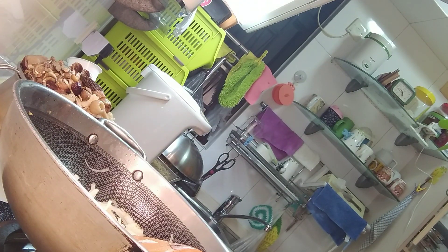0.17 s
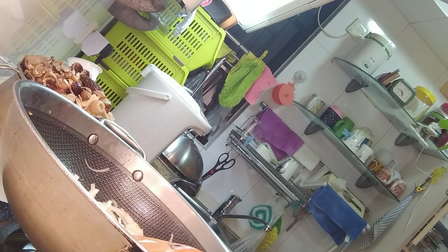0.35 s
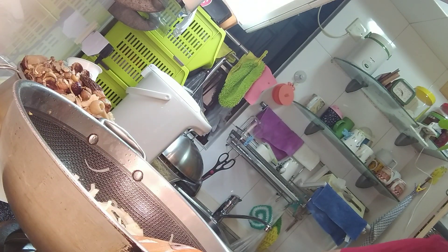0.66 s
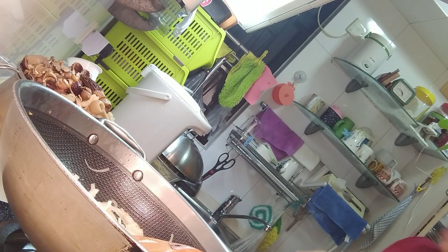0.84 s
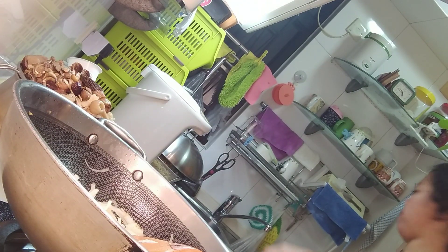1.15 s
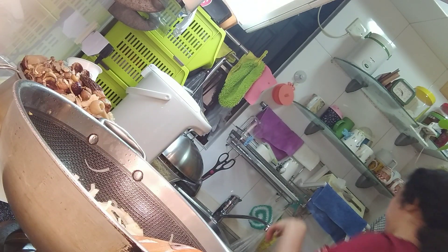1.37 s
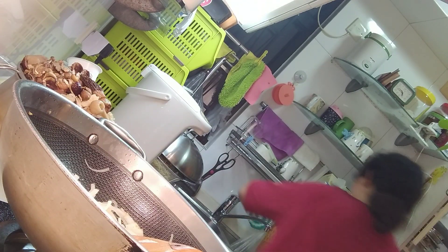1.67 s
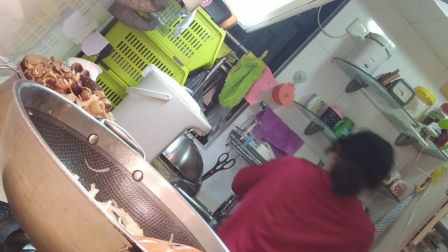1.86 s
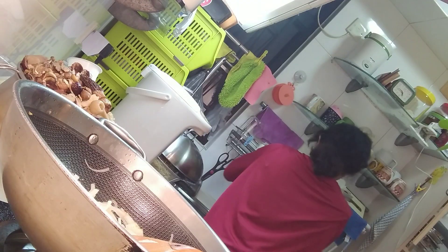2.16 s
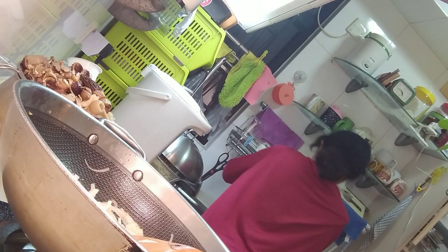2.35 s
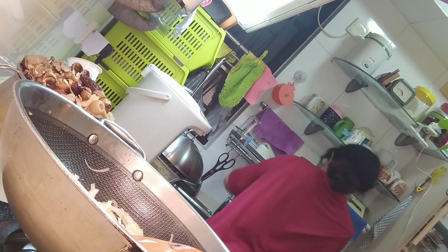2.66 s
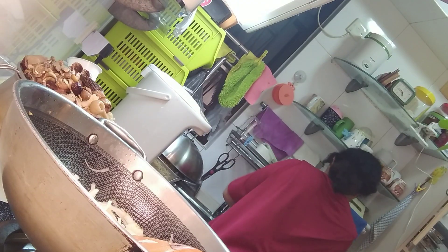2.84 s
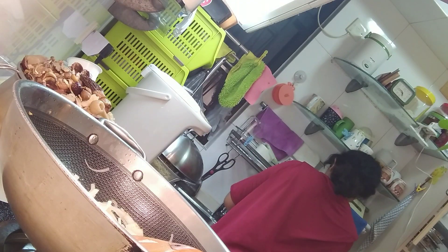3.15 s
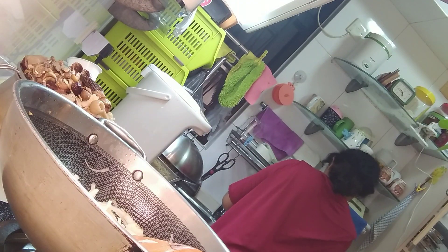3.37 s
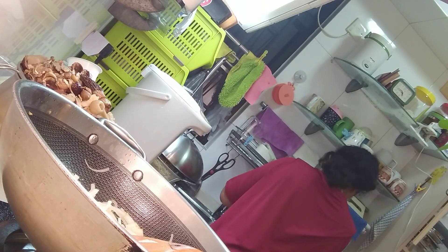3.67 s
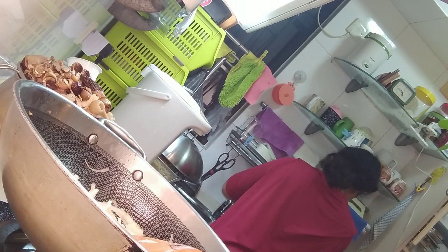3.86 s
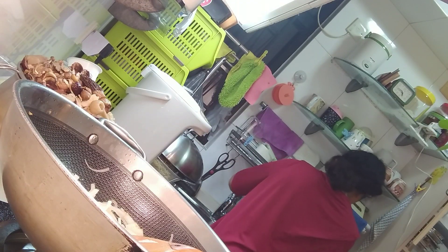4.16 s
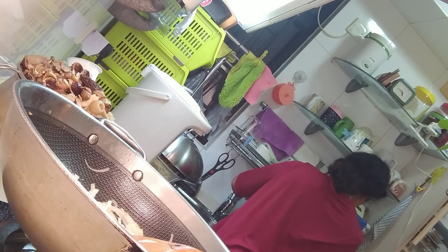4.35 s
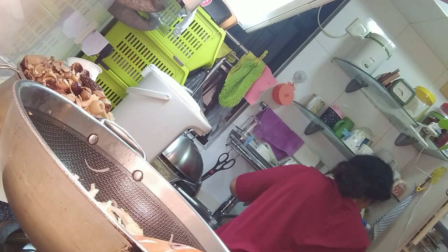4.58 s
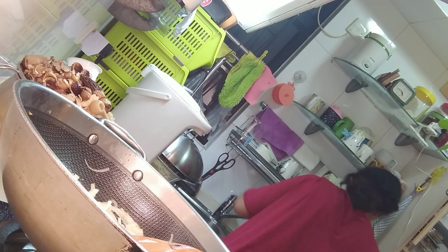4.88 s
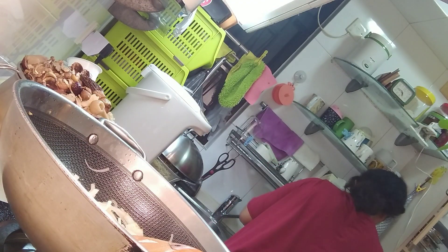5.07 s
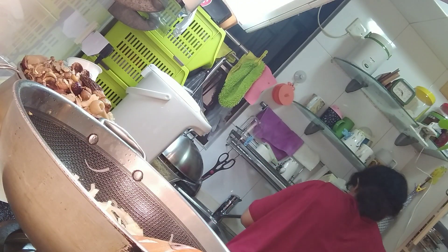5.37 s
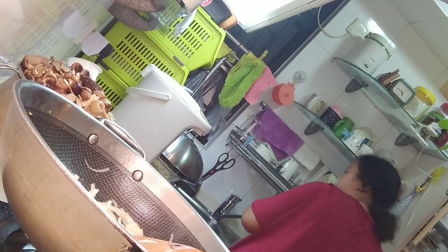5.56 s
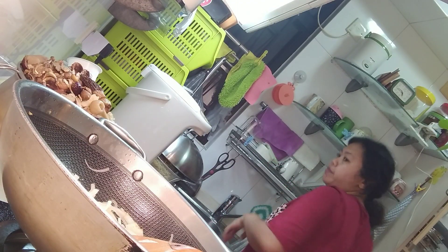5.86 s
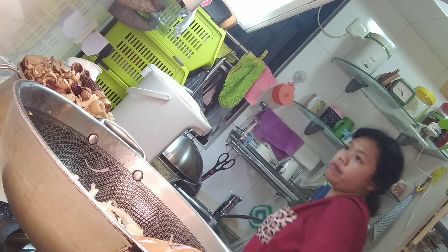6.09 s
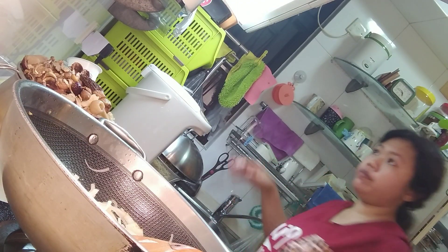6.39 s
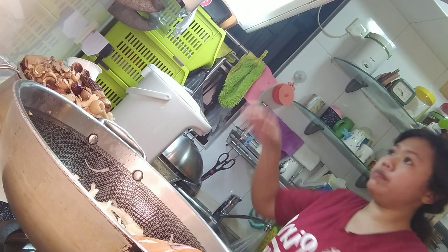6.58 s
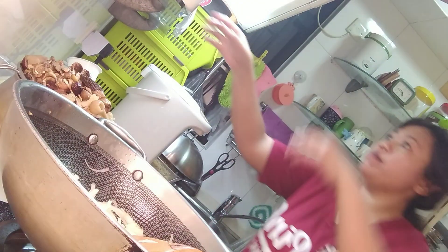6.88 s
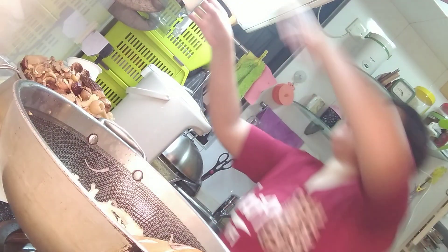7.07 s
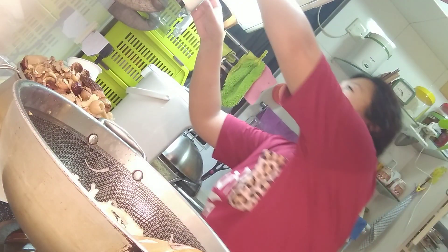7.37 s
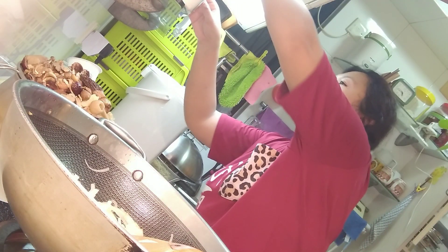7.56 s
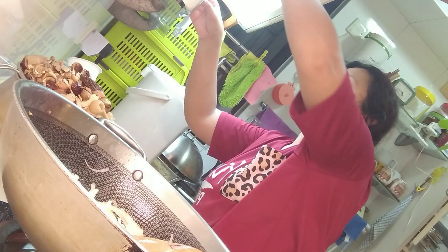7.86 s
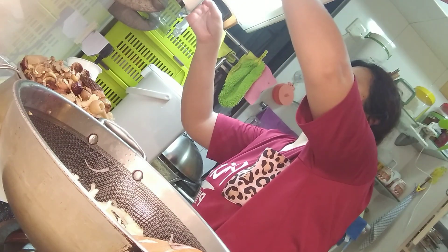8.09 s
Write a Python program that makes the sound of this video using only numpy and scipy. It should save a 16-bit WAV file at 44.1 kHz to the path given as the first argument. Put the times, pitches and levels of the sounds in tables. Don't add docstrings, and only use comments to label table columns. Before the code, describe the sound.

Steady wok sizzle, bubbling steam and deep fan rumble run throughout, barely changing. Over them come a firm dull footstep, later a softer one with small shuffles, and a brief brush of clothing. Then a hard bright clack, quick bounces and a low wooden door slide with jolting bumps, ending in small knocks. It is a close home-kitchen perspective; the left is hollow and metallic from a nearby bowl, the right plainer and more open.

```python
import sys
import numpy as np
from scipy import signal
from scipy.fft import rfft, irfft, next_fast_len
from scipy.io import wavfile
from scipy.ndimage import uniform_filter1d, map_coordinates

SR = 44100
rng = np.random.default_rng(int(sys.argv[2]) if len(sys.argv) > 2 else 0)


def rack_gain(trim_db):
    fader = np.asarray(trim_db, float)
    return 10 ** (fader / 20)


def output_pcm(signal):
    pcm = np.clip(np.atleast_2d(signal).T, -1, 1) * 32767
    wavfile.write(sys.argv[1], SR, np.round(pcm).astype(np.int16))


N = 362943

# (frequency [Hz], level [dB per Hz])
KITCHEN_AIR = [(18, -75.5), (40, -77.1), (62, -79.7), (120, -76.5), (160, -73.4), (270, -67.6),
               (330, -82.3), (500, -77.9), (1000, -84.4), (2000, -86.6), (4000, -86.2), (7500, -93.3),
               (12500, -100.7), (15700, -107.7)]
# (frequency [Hz], width [Hz], boost [dB])
DUCT_MODES = [(28, 6, -5), (36, 10, 3), (48, 16, -3), (72, 47, 18.5), (92, 14, 4), (108, 12, -4),
              (132, 12, 9), (211, 50, 4.3)]
LAYER_EDGES_HZ = (140, 600, 5200)
# (frequency [Hz], likeness [0-1])
PORT_LIKENESS = [(20, .98), (60, 1), (290, .98), (318, .5), (350, .85), (480, .9), (560, .35), (650, .15),
                 (790, .9), (920, .3), (1200, .88), (1400, .15), (1700, .7), (1950, .25)]
# (time [s], level [dB])
RUMBLE_DRIFT = [
    (0, 2),
    (.35, 0),
    (.6, 3.5),
    (1.4, -1.5),
    (4.5, 1),
    (6.9, 1.5),
    (8.2, 0),
]
# (time [s], level [dB])
FRYING_HEAT = [
    (0, -0.16),
    (2.1, -.4),
    (2.7, 1),
    (3.6, .2),
    (4.5, 0.3),
    (6, 0),
    (8.2, 0.3),
]
RUMBLE_DB, ROAR_DB, SIZZLE_DB, FIZZ_DB = -0.54, -0.03, 0.04, .1
# (frequency [Hz], level [dB rms])
MOTOR_HUM = (99.8, -50)
# (time [s], peak [dB], floor pitch [Hz], board rumble [dB])
HEEL_LANDINGS = [
    (2.034, -24, 88, -45),
    (4.466, -31, 45, -46.5),
]
SOLE_DELAY_S, SOLE_LOSS_DB, SOLE_HZ = .006, -8, 185
BOARD_LEAD_S, BOARD_HOLD_S = .04, .13
# (time [s], peak [dB])
FOOT_SHUFFLES = [
    (2.058, -33),
    (4.484, -36),
    (4.53, -44),
    (4.76, -36),
]
# (frequency [Hz], gain [dB])
CLOTH_COLOUR = [(200, -12), (480, 4), (800, 3), (1500, -12), (2100, -7), (2600, 0), (3200, -9), (4500, -16),
                (9000, -40)]
# (start [s], hold [s], level [dB])
CLOTH_BRUSHES = [
    (3.6, .07, -60),
    (4.55, 0.35, -64),
    (6.04, 0.095, -50.5),
]
RISE_DB_PER_S, FALL_DB_PER_S = 330, 170
# (time [s], peak [dB], time to fade 60 dB [s], dullness [dB per octave], bowl ring [dB])
HARD_CONTACTS = [
    (7.507, -32, .03, -6, -30),
    (7.5105, -14.5, .04, 0, -31),
    (7.5175, -24, .08, 0, -42),
    (7.526, -29, .11, -3, -35),
    (7.547, -36, .12, -4, -32),
    (7.637, -55, .1, -9, -46),
    (7.745, -48, .1, -9, -43),
    (7.783, -55, .1, -9, -48),
    (8.042, -39, .08, -7, -33),
    (8.0966, -42, .1, -7, -31.5),
]
# (frequency [Hz], level [dB per Hz])
CATCH_COLOUR = [(300, -12), (450, -7), (650, -17), (850, -10), (1080, -16), (1400, -2), (2150, 0),
                (2500, -8), (3200, -9), (4000, -17), (5000, -27), (7000, -42), (15000, -65)]
# (frequency [Hz], time to fade 60 dB [s])
BOWL_RINGING = (1432, .17)
# (frequency [Hz], gain [dB])
PANEL_COLOUR = [(25, -2), (70, -1), (160, 0), (280, -9), (450, -10), (800, -18), (1500, -28), (4000, -50)]
# (start [s], hold [s], rumble [dB])
DOOR_SLIDES = [
    (7.602, 0.24, -42),
    (8.052, 0.094, -47.5),
]
# (time [s], peak [dB], pitch [Hz])
PANEL_RATTLES = [(7.588, -33.5, 250), (7.626, -28.5, 268), (7.656, -31, 238), (7.686, -35, 280),
                 (7.702, -41.5, 300), (7.732, -37.5, 285), (7.755, -31.5, 274), (7.772, -32, 237),
                 (7.785, -36, 241), (7.81, -38.5, 282), (7.832, -38.5, 268)]
# (time [s], peak [dB])
RUNNER_THUDS = [
    (7.611, -37),
    (7.669, -33),
    (7.7, -24.5),
    (7.797, -24.5),
    (7.899, -37),
]
RATTLE_CYCLES, THUD_HZ, THUD_CYCLES = 3.4, 144, 1.4
# (frequency [Hz], gain [dB])
BOWL_COLOUR = [(18, 2.0), (150, 3.4), (240, 7.2), (350, 7.4), (420, -2.9), (520, -18.1), (880, -10.9),
               (1000, 2.9), (1600, -7.5), (1900, -4.6), (2300, 1.2), (5500, 4.6), (9000, -3.5),
               (15700, -0.6)]
# (frequency [Hz], width [Hz], boost [dB])
BOWL_RESONANCES = [(259, 26, 7.1), (310, 38, 20.7), (466, 29, 6.0), (582, 77, 8.9), (801, 100, 8.1),
                   (976, 39, 6.9), (1098, 23, 4.8), (1134, 25, -5.7), (1208, 12, -1.6), (1290, 200, 10.3),
                   (1439, 80, 19.1), (1534, 31, 5.9), (1635, 76, 5.7), (2064, 115, 14.8), (2373, 53, 4.4),
                   (2568, 67, 6.7), (2785, 223, 7.4), (3061, 150, 5.0), (3224, 94, -3.4), (3690, 211, 2.3),
                   (3878, 116, 2.6), (3981, 54, 2.0), (4165, 164, 5.0), (4460, 83, -2.6), (4733, 48, -2.1),
                   (4902, 166, 3.4), (6053, 500, 3.2), (6559, 470, 8.3), (7074, 315, 5.5),
                   (7713, 2000, 12.4)]
# (frequency [Hz], lag of the left port [radians])
BOWL_DETOUR = [(0, 0), (240, .6), (480, 1.5), (600, .6), (720, .5), (840, 1.9), (1000, 1.7), (1100, 4.7),
               (1270, 4.2), (1620, 6.3), (1760, 6.2), (2700, 12.8), (4000, 18.8), (22050, 95)]
# (frequency [Hz], width [Hz], boost [dB])
OPEN_RESONANCES = [(316, 12, -8.6), (404, 16, 1.3), (466, 30, 6.7), (698, 63, -6.1), (785, 35, 4.8),
                   (856, 75, 7.8), (1004, 12, -2.0), (1085, 100, 3.7), (1175, 27, 5.3), (1247, 49, 6.6),
                   (1385, 16, 0.9), (1536, 17, 3.2), (1810, 20, 1.8), (1914, 24, -4.0), (2081, 150, 2.2),
                   (2650, 150, 2.1), (3392, 86, 2.1), (10513, 2601, 11.4)]


def unit(x):
    return x / np.sqrt(np.mean(x ** 2) + 1e-20)


def along(points, hz):
    f, v = np.transpose(points)
    return np.interp(np.log(hz + 1), np.log(f + 1), v)


def bells(modes, hz):
    return sum(db / (1 + (2 * (hz - centre_hz) / width_hz) ** 2) for centre_hz, width_hz, db in modes)


def curve(points):
    s, value = np.transpose(points)
    return np.interp(np.arange(N) / SR, s, value)


def wobble(rate):
    knots = rng.standard_normal(int(N * rate / SR) + 4)
    return map_coordinates(knots, [np.arange(N) * rate / SR])


def filtered(x, db_at, lag_at=lambda hz: 0):
    lead = SR // 8
    m = 2 * next_fast_len(N // 2 + SR // 4)
    hz = np.fft.rfftfreq(m, 1 / SR)
    cepstrum = irfft(db_at(hz) * np.log(10) / 20, m)
    cepstrum[1:m // 2] *= 2
    cepstrum[m // 2 + 1:] = 0
    response = np.exp(rfft(cepstrum) - 1j * lag_at(hz))
    x = np.concatenate([x[..., SR:SR + lead], x], axis=-1)
    return irfft(rfft(x, m) * response, m)[..., lead:lead + N]


def diffuse(first, second):
    likeness = along(PORT_LIKENESS, np.fft.rfftfreq(N, 1 / SR))
    turn = np.arccos(np.clip(likeness, 0, 1)) / 2
    mid = rfft(first) * np.cos(turn)
    side = rfft(second) * np.sin(turn)
    return irfft([mid + side, mid - side], N)


def swells(rows):
    t = np.arange(N) / SR
    gain = 0
    for s, hold, db in rows:
        before, after = (s - t).clip(0), (t - s - hold).clip(0)
        gain = gain + rack_gain(db - RISE_DB_PER_S * before - FALL_DB_PER_S * after)
    return gain


def bumps(rows):
    out = np.zeros(N + SR)
    t = np.arange(SR // 6) / SR
    for s, db, push_hz, cycles in rows:
        swell = t * push_hz / cycles * 4.0
        push = np.e * swell * np.exp(-swell) * np.sin(-2 * np.pi * push_hz * t)
        out[round(s * SR):][:len(t)] += rack_gain(db) * push
    return out[:N]


def wood_rumble(rows):
    wood = unit(filtered(rng.standard_normal(N), lambda hz: along(PANEL_COLOUR, hz)))
    return swells(rows) * wood


def patchy(patch_db, pops, pop_db):
    z = signal.stft(rng.standard_normal(N), nperseg=512)[2]
    field = uniform_filter1d(rng.standard_normal(z.shape), size=8, axis=0)
    field = uniform_filter1d(field, size=10, axis=1)
    hiss = signal.istft(z * rack_gain(patch_db * unit(field)), nperseg=512)[1][:N]
    when, size = rng.random((2, N))
    bubble_gain = rack_gain(-pop_db * np.log(size + 1e-4))
    bubbles = (when < pops / SR) * bubble_gain * rng.standard_normal(N)
    return unit(unit(hiss) + 0.37 * unit(bubbles))


def frying():
    hz = np.fft.rfftfreq(N, 1 / SR)
    below = [0 * hz] + [1 / (1 + (hz / edge) ** 6) for edge in LAYER_EDGES_HZ] + [1 + 0 * hz]
    spit = .3 * wobble(5) + .3 * wobble(12)
    frying_db = curve(FRYING_HEAT) + spit
    levels_db = [RUMBLE_DB + curve(RUMBLE_DRIFT),
                 ROAR_DB + .4 * wobble(2.2),
                 SIZZLE_DB + frying_db + 0.25 * wobble(10.0),
                 FIZZ_DB + frying_db + 0.47 * wobble(9.7)]
    pair = 0
    for k, level_db in enumerate(levels_db):
        noise = [patchy(patch_db=0.5, pops=900, pop_db=2.0) for _ in "LR"]
        share = np.sqrt(np.abs(below[k + 1] - below[k]))
        pair = pair + irfft(rfft(noise) * share, N) * rack_gain(level_db)
    air = diffuse(*pair) * np.sqrt(SR / 2)
    return filtered(air, lambda hz: along(KITCHEN_AIR, hz) + bells(DUCT_MODES, hz) + 0.21)


def hum():
    hum_hz, db = MOTOR_HUM
    phase = 2 * np.pi * hum_hz * np.arange(N) / SR + .4 * wobble(1.5)
    return np.sqrt(2) * rack_gain(db + .8 * wobble(1.2)) * np.sin(phase)


def steps():
    heels = [(s, db, floor_hz, 1.2) for s, db, floor_hz, _ in HEEL_LANDINGS]
    soles = [(s + SOLE_DELAY_S, db + SOLE_LOSS_DB, SOLE_HZ, 1.5) for s, db, *_ in HEEL_LANDINGS]
    shuffles = [(s, db, 225, 3.1) for s, db in FOOT_SHUFFLES]
    boards = [(s - BOARD_LEAD_S, BOARD_HOLD_S, db) for s, *_, db in HEEL_LANDINGS]
    return (bumps(heels + soles + shuffles) + wood_rumble(boards)) * np.ones((2, 1))


def scuffs():
    noise = diffuse(*rng.standard_normal((2, N)))
    cloth = unit(filtered(noise, lambda hz: along(CLOTH_COLOUR, hz)))
    left, right = swells(CLOTH_BRUSHES) * rack_gain(1.5 + 1.5 * wobble(30)) * cloth
    return np.array([filtered(left, lambda hz: bells([(660, 240, 8.8)], hz)), right])


def clacks():
    out = np.zeros((2, N + SR))
    t = np.arange(SR // 4) / SR
    hz = np.fft.rfftfreq(len(t), 1 / SR)
    octaves_up = np.log2((hz + 1) / 1500).clip(0, None)
    for s, db, t60, tilt_db, _ in HARD_CONTACTS:
        colour = rack_gain(along(CATCH_COLOUR, hz) + tilt_db * octaves_up)
        noise = rng.standard_normal((3, len(t)))
        ports = .6 * noise[0] + .8 * noise[1:]
        burst = unit(irfft(rfft(ports) * colour, len(t)))
        fade = rack_gain(-60 * t / t60) + rack_gain(-18 - 60 * t / .25)
        onset = np.minimum(t / .0015, 1)
        start = round(s * SR)
        out[:, start:start + len(t)] += rack_gain(db - 9) * burst * fade * onset
    from_above = [(700, 300, 5), (1439, 70, -15), (1750, 300, 6), (2060, 100, -7), (2400, 400, 4)]
    shaded = filtered(out[0, :N], lambda hz: bells(from_above, hz))
    return np.array([shaded, out[1, :N]])


def bowl_ring():
    out = np.zeros(N + SR)
    t = np.arange(SR // 3) / SR
    note_hz, t60 = BOWL_RINGING
    for s, *_, ring_db in HARD_CONTACTS:
        ring = np.sin(2 * np.pi * note_hz * (t + s)) * np.minimum(t / 0.0027, 1)
        out[round(s * SR):][:len(t)] += rack_gain(ring_db - 60 * t / t60) * ring
    return out[:N]


def door():
    rattles = [(*row, RATTLE_CYCLES) for row in PANEL_RATTLES]
    thuds = [(s, db, THUD_HZ, THUD_CYCLES) for s, db in RUNNER_THUDS]
    return (wood_rumble(DOOR_SLIDES) + bumps(rattles + thuds)) * np.ones((2, 1))


def ripple(hz, step_hz):
    hills = map_coordinates(rng.standard_normal(int(SR / step_hz) + 4), [hz / step_hz])
    return hills * np.clip(hz / 1500 - 1, 0, 1)


def through_bowl(left):
    modes = BOWL_RESONANCES + [(1432, 30, -.4)]

    def gain_db(hz):
        return along(BOWL_COLOUR, hz) + bells(modes, hz) + 1.2 * ripple(hz, step_hz=70)

    def lag(hz):
        return np.interp(hz, *np.transpose(BOWL_DETOUR)) + 1.1 * ripple(hz, step_hz=220)

    return filtered(left, gain_db, lag)


def through_open_air(right):
    modes = OPEN_RESONANCES + [(252, 18, 4.1)]
    return filtered(right, lambda hz: bells(modes, hz) + 1.2 * ripple(hz, step_hz=90.9))


def scene():
    left, right = frying() + hum() + steps() + scuffs() + clacks() + door()
    return np.array([through_bowl(left) + bowl_ring(), through_open_air(right)])


def roll_off(x):
    return signal.sosfilt(signal.butter(12, 15780, fs=SR, output="sos"), x)


def record(dry):
    return roll_off(dry)


dry = scene()
out = record(dry)
output_pcm(out)
```